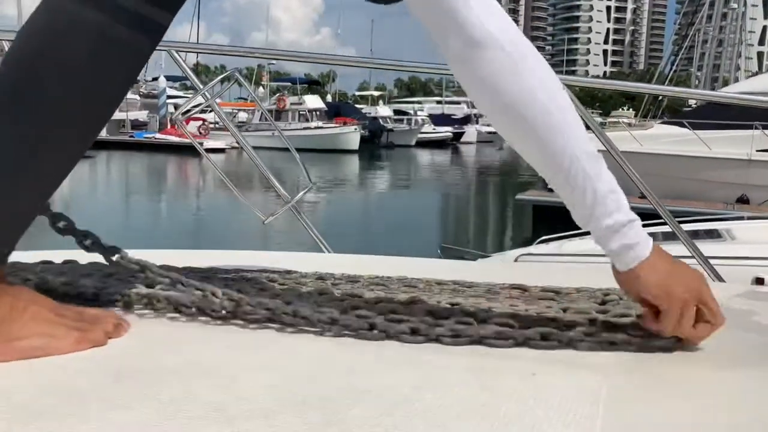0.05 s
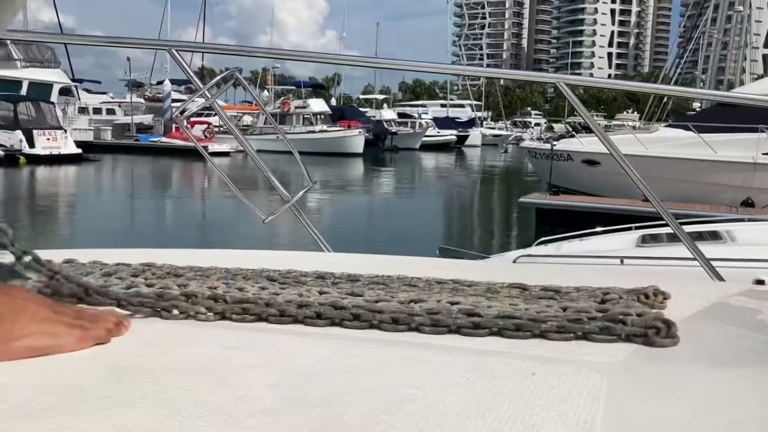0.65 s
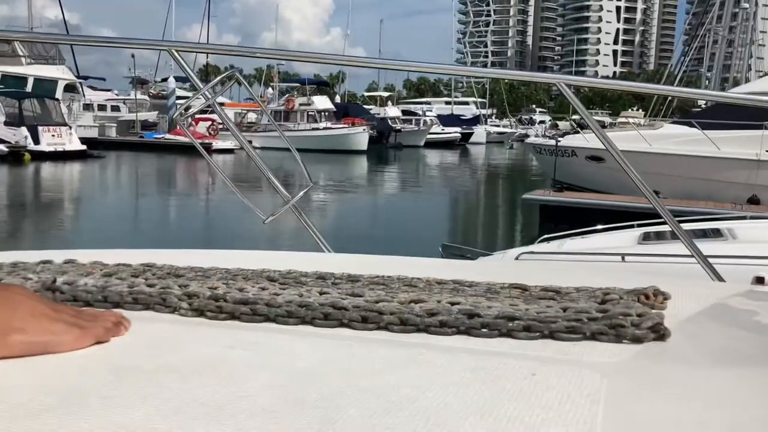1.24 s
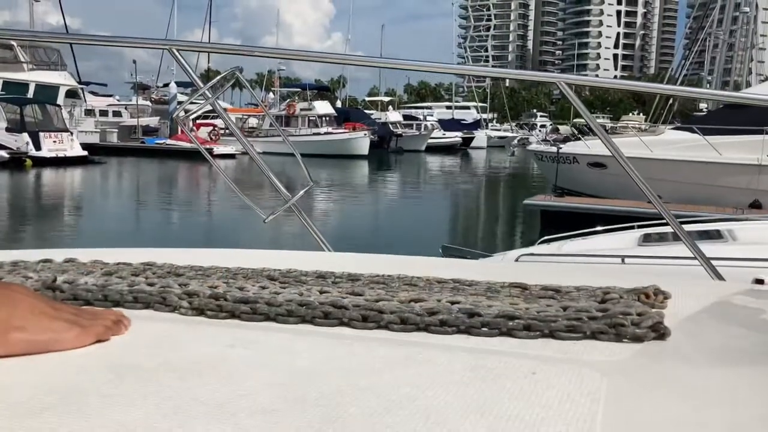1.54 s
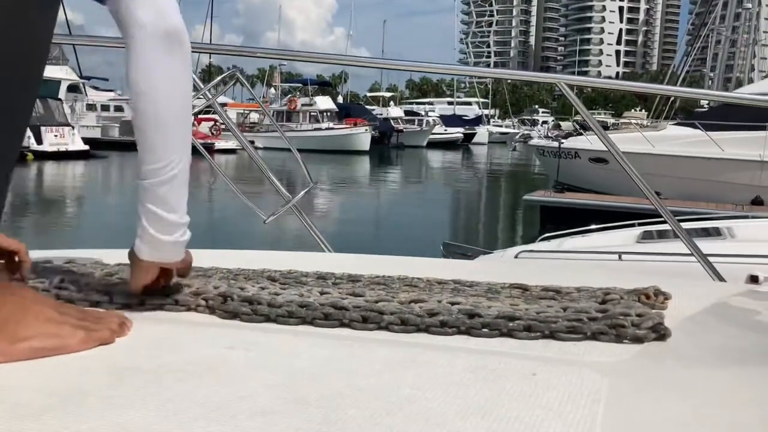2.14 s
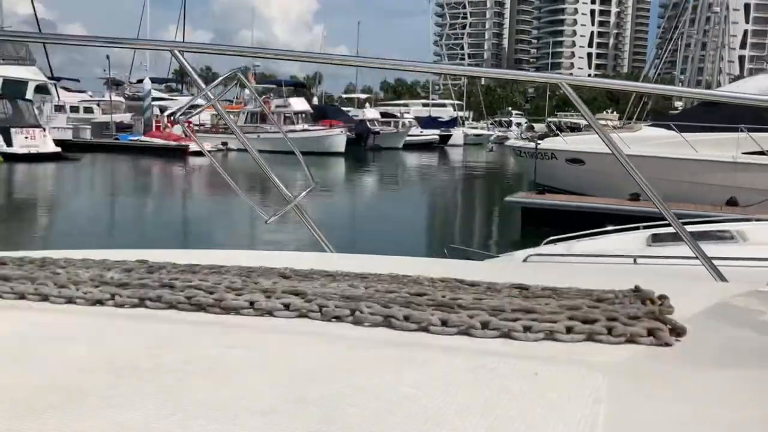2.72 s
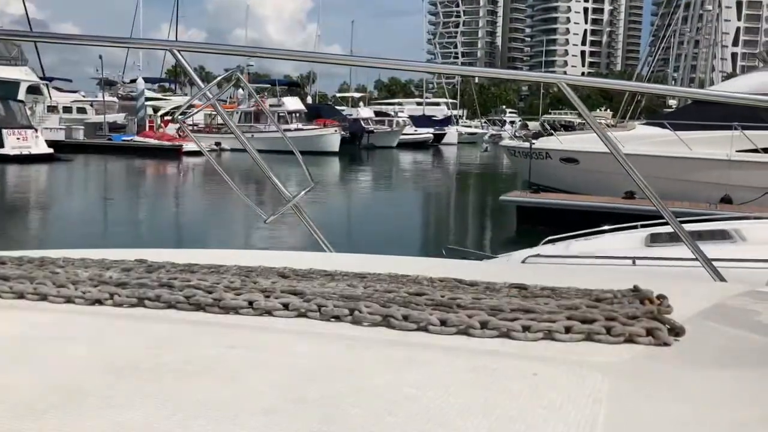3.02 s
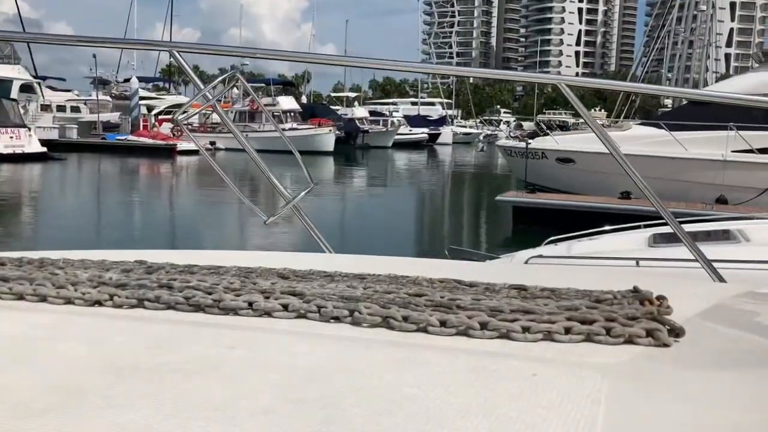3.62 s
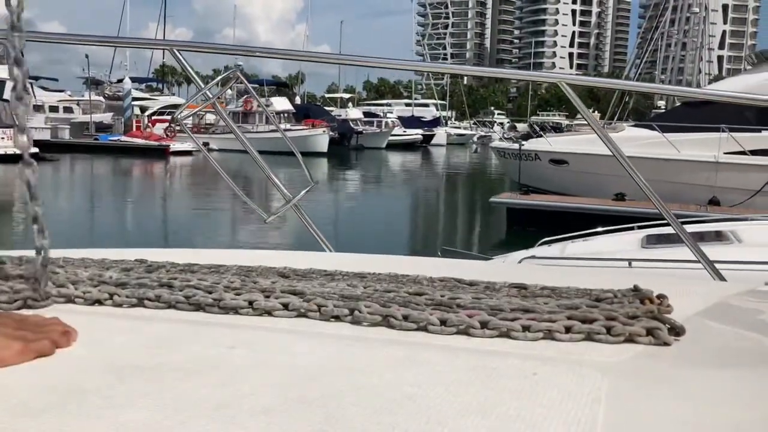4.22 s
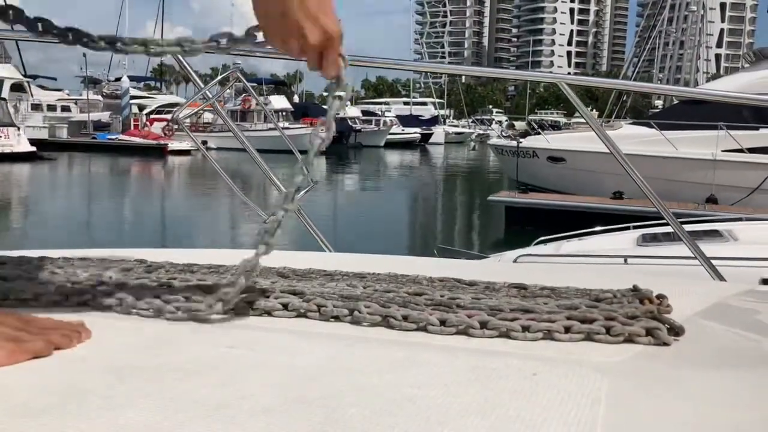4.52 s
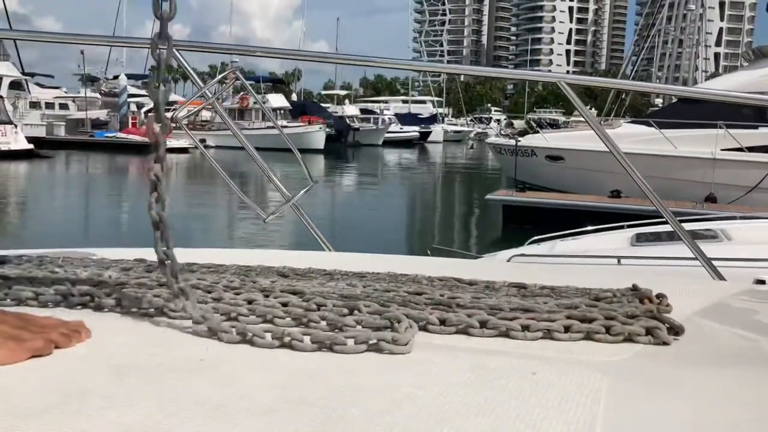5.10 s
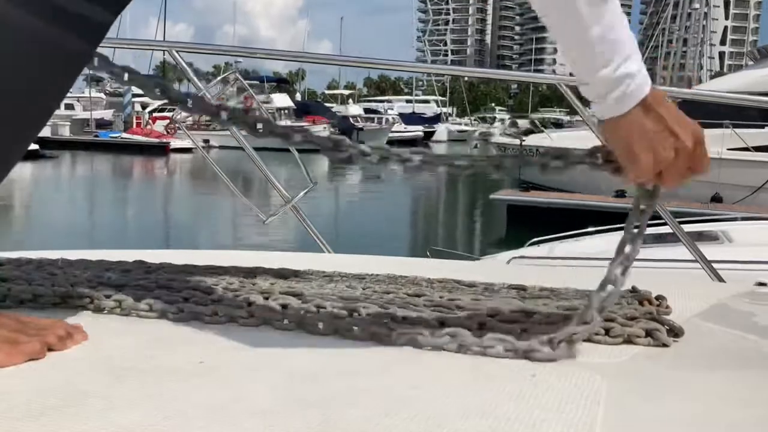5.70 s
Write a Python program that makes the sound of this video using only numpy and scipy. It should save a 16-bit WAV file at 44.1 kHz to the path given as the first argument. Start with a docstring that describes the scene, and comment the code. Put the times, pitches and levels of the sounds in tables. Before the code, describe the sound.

A heavy steel anchor chain is hauled and laid on a hollow fibreglass boat deck, heard close and slightly left, over a steady low marina rumble. It opens with a rattling drop and deck thumps in the first 0.2 seconds. Short, uneven rattles and gritty scrapes follow, with distinct dull clacks at about 0.8, 1.2, 1.9 and 2.5 seconds and faint settling clicks between. The deck booms deeply near 2.9 seconds, and a sharp, loud clack lands at 3.2. From 3.5 to 4 seconds the links rattle more brightly, with small ticks. The hull grumbles in swells from about 3.8 to 4.8 seconds as weight shifts, and a heavy dull knock of chain hits the deck at 4.75. More clacks and rattles come around 5.2 seconds, a brief thin ring at 5.5, and a last clack at 5.7.

```python
"""A heavy steel anchor chain rattles and clacks, hauled hand over hand and laid in rows on a boat deck.
Links knock dully on the pile, scrape as they slide, and ring only when they hang free.
The hollow fibreglass deck booms and grumbles under feet and chain; the marina rumbles behind."""
import sys
import numpy as np
from scipy.fft import rfft, irfft, next_fast_len
from scipy.io import wavfile
from scipy.ndimage import uniform_filter1d, minimum_filter1d, map_coordinates

SR = 44100
rng = np.random.default_rng(int(sys.argv[2]) if len(sys.argv) > 2 else 0)


def inscribe(sig):
    """Save sig as 16-bit PCM at rate SR to the path in sys.argv[1].

    A 1-D sig is mono; a 2-D sig holds one channel per row.
    Samples are clipped to [-1, 1] before scaling.
    """
    pcm = np.round(np.clip(np.atleast_2d(sig).T, -1, 1) * 32767)
    wavfile.write(sys.argv[1], SR, pcm.astype(np.int16))


N = 253575
KNOCK_REF_DB = -22.5  # lighter contacts sound more of the deck, harder ones more of the link
MODE_GAIN, MODE_Q = 0.93, 70


def amp(db):
    """Decibels to gain."""
    return 10 ** (np.asarray(db) / 20)


def unit(x):
    """Scale each row to rms 1."""
    return x / np.sqrt(np.mean(np.abs(x) ** 2, axis=-1, keepdims=True) + 1e-20)


def spectrum_db(points, hz):
    """Interpolate (Hz, dB) points on a log frequency axis."""
    point_hz, db = np.transpose(points)
    return np.interp(np.log(hz + 1), np.log(point_hz + 1), db)


def wobble(rate_hz):
    """Smooth random curve, rate_hz knots a second."""
    knots = rng.standard_normal(int(N * rate_hz / SR) + 4)
    return map_coordinates(knots, [np.arange(N) * rate_hz / SR])


def movement(t, start, end, rise_db_per_s=1000, fall_db_per_s=900):
    """Envelope that gathers before start and settles after end."""
    return amp(-rise_db_per_s * np.maximum(start - t, 0) - fall_db_per_s * np.maximum(t - end, 0))


def filtered(x, response):
    """Apply a frequency response to x."""
    size = next_fast_len(N + SR // 2)
    return irfft(rfft(x, size) * response(np.fft.rfftfreq(size, 1 / SR)), size)[..., :N]


def resonance(hz, centre_hz, q):
    """Causal response of one damped mode."""
    damping = 1j * hz * centre_hz / q
    return damping / (centre_hz ** 2 - hz ** 2 + damping)


def minimum_phase(points, hz):
    """Causal response through (Hz, dB) points."""
    cepstrum = irfft(np.log(amp(spectrum_db(points, hz))))
    half = len(cepstrum) // 2
    cepstrum[1:half] *= 2
    cepstrum[half + 1:] = 0
    return np.exp(rfft(cepstrum))


def stereo_noise(points, side_db):
    """Noise of rms 1, shaped by (Hz, dB) points."""
    mid, side = filtered(rng.standard_normal((2, N)), lambda hz: amp(spectrum_db(points, hz)))
    return unit(np.array([mid + amp(side_db) * side, mid - amp(side_db) * side]))


def placed(times, sounds):
    """Sum one short sound per time into a track."""
    index = np.round(np.maximum(times, 0) * SR).astype(int)[:, None] + np.arange(sounds.shape[-1])
    return np.bincount(index.ravel(), sounds.ravel(), N)[:N]


def tones(times, hz, db, t60_s, attack_s, size=16384):
    """Damped modes with a soft start."""
    t = np.arange(size) / SR
    envelope = (1 - np.exp(-t / attack_s)) * amp(-60 * t / t60_s[:, None])
    envelope /= envelope.max(axis=1, keepdims=True)
    return placed(times, amp(db)[:, None] * envelope * np.sin(2 * np.pi * hz[:, None] * t))


# Position of the moving chain. Each row: time in seconds, lead of the left channel in ms.
CHAIN_PATH = [(0, -0.1), (.5, -0.037), (1.2, 0.24), (1.6, 0.24), (1.85, .067), (2.55, 0.086), (2.72, 0.29),
              (3.3, 0.24), (4.52, 0.33), (4.62, 0.04), (5.0, 0.16), (5.16, 0.32), (5.28, 0.03),
              (5.75, 0.22)]


def left_lead_ms(times):
    """The nearer side hears the chain earlier."""
    return np.interp(times, *np.transpose(CHAIN_PATH))


def strikes(times, gains, colour, scatter_db, scatter_t60_s, size=1024):
    """Sharp blows, each passed on through neighbouring links as its own short scatter."""
    t, hz = np.arange(size) / SR, np.fft.rfftfreq(size, 1 / SR)
    noise = rng.standard_normal((len(times), 2, size))
    scatter = unit(noise * amp(-60 * t / scatter_t60_s)) / np.sqrt(size)
    blow = (1 + amp(scatter_db) * rfft(scatter)) / np.hypot(1, amp(scatter_db))
    # bending waves in the deck carry the treble first: a downward chirp
    travel_s = 0.001  # at 1 kHz
    chirp = np.exp(-4j * np.pi * travel_s * np.sqrt(hz * 1000))
    body = gains[:, None] * colour(hz) * chirp
    lead_ms = (left_lead_ms(times) + rng.normal(0, 0.042, len(times)))[:, None]
    pan_db = 11 * lead_ms - 2.5
    ears = [amp(sign * pan_db / 2) * np.exp(sign * 1j * np.pi * hz * lead_ms / 1000) for sign in (1, -1)]
    return np.array([placed(times - travel_s, irfft(blow[:, c] * body * ear))
                     for c, ear in enumerate(ears)])


# Short modes of the damped links and the deck under them, in Hz.
PILE_MODES_HZ = [390, 760, 1010, 1110, 1550, 1890, 2370, 2930, 3110, 3410, 3654, 3966, 4430, 5174, 5728,
                 7180, 8070]
# Treble of steel on steel. Each row: frequency in Hz, relative level in dB.
STEEL_SPECTRUM = [(1500, -57), (2500, -4), (3100, -3.5), (3700, 4), (4400, 0.5), (5200, -5.5),
                  (6200, -11.5), (7200, -9), (8500, -5.5), (10100, -24), (11500, -55)]


def link_colour(hz, pitch_hz, knock_db, tick_db, q, deck_hz):
    """A link damped by the pile: a short clack, the deck's knock below, a steel tick above."""
    modes = np.array([resonance(hz, mode_hz, MODE_Q) for mode_hz in PILE_MODES_HZ])
    # every contact excites the modes at new strengths
    ring = 1 + MODE_GAIN * rng.standard_normal((len(pitch_hz), len(modes))) @ modes
    clack = unit(ring * resonance(hz, pitch_hz[:, None], q) ** 3 / (1 + (hz / 3500) ** 8))
    knock = unit(ring * resonance(hz, deck_hz, q=0.57) ** 2)
    tick = unit(ring * minimum_phase(STEEL_SPECTRUM, hz))
    return clack + amp(knock_db[:, None]) * knock + amp(tick_db[:, None]) * tick


# Each row: start in seconds, end in seconds, level in dB, treble in dB re that level.
CHAIN_SLIDES = [(0, 0.039, -24.5, -37.5), (0.039, 0.161, -35.5, -38.5), (0.199, 0.241, -43.5, -42.5),
                (0.486, 0.583, -49.5, -32), (0.605, 0.637, -40.5, -14.5), (.868, 0.936, -37.5, -27),
                (0.953, 1.025, -40, -28.5), (1.048, 1.074, -23.5, -21.5), (1.147, 1.175, -44.5, -11.5),
                (1.35, 1.398, -42.5, -8), (1.444, 1.474, -32.5, -23), (1.482, 1.529, -42, -16),
                (1.58, 1.61, -27.5, -13), (1.672, 1.73, -35.5, -12.5), (1.801, 1.844, -31.5, -19),
                (1.9, 1.929, -23, -17), (1.941, 1.999, -45, -15), (2.152, 2.234, -52.5, -27),
                (2.293, 2.329, -48.5, -31), (2.482, 2.494, -24, -24), (2.643, 2.676, -35.5, -18.5),
                (2.709, 2.784, -34.5, -22), (2.97, 3.04, -44, -21), (3.189, 3.215, -27.5, -22),
                (3.238, 3.261, -36, -18), (3.281, 3.343, -29.5, -16), (3.584, 3.609, -29.5, -13),
                (3.635, 3.684, -31, -11.5), (3.707, 3.836, -29, -8.5), (3.883, 3.969, -30, -14.5),
                (4.119, 4.168, -41.5, -14), (4.213, 4.334, -52, -23), (4.342, 4.415, -32.5, -19),
                (4.414, 4.479, -28.5, -14.5), (4.494, 4.581, -37.5, -11.5), (4.606, 4.74, -39, -14.5),
                (4.767, 4.868, -30, -39), (5.043, 5.12, -47.5, -37), (5.144, 5.197, -28, -16),
                (5.254, 5.319, -30, -20), (5.314, 5.432, -42.5, -34), (5.492, 5.587, -37, -12.5)]


def rattle(count=34, lead_s=0.008, tail_s=0.012, spread_db=6.5, fade_db=3.5, on_deck_db=-24):
    """A length of chain shifts: a fading shower of unequal contacts, denser in a quick jerk."""
    contacts = []
    for start, end, db, tick_db in CHAIN_SLIDES:
        length_s = end - start + lead_s + tail_s
        times = start - lead_s + length_s * (np.arange(count) + rng.random(count)) / count
        size_db = spread_db * np.clip(rng.standard_normal(count), -2, 1.2)
        sizes = unit(amp(size_db - fade_db * (times - start) / length_s))
        gains = amp(db) * sizes * movement(times, start, end) * np.sqrt(SR * length_s / count)
        dullness_db = max(on_deck_db - tick_db, 0)  # a dull slide lies on the deck and knocks more
        knock_db = -6 - 0.42 * (db - KNOCK_REF_DB) + 0.39 * dullness_db
        contacts.append(np.broadcast_arrays(times, gains, knock_db, tick_db))
    times, gains, knock_db, tick_db = np.concatenate(contacts, axis=1)
    pitch_hz = 1226 * np.exp(0.33 * rng.standard_normal(len(times)))
    colour = lambda hz: link_colour(hz, pitch_hz, knock_db, tick_db, q=1.81, deck_hz=450)
    return strikes(times, gains, colour, scatter_db=-3, scatter_t60_s=0.025)


def scrape(share_db=-5, catch_db=2.5, lurch_db=8.5):
    """Rough galvanised steel hisses in each slide, catching on its grain, lurching link by link."""
    t = np.arange(N) / SR
    coarse_t = t[::64]
    rubs = [amp(db + tick_db) * movement(coarse_t, start, end) for start, end, db, tick_db in CHAIN_SLIDES]
    envelope = np.interp(t, coarse_t, np.max(rubs, axis=0))
    roughness = unit(amp(catch_db * wobble(220) + lurch_db * wobble(55)))
    modes = lambda hz: 1 + MODE_GAIN * sum(resonance(hz, mode_hz, MODE_Q) for mode_hz in PILE_MODES_HZ)
    steel = unit(filtered(stereo_noise(STEEL_SPECTRUM, side_db=-5.5), modes))
    hiss = amp(share_db) * envelope * roughness * steel
    lead_s = left_lead_ms(t) / 1000
    return np.array([np.interp(t + sign * lead_s / 2, t, ear) for sign, ear in zip((1, -1), hiss)])


def settling(count=520, loudest_db=-22, range_db=13):
    """The pile never quite rests: single links slip faintly into place."""
    when, softness, pitch = rng.random((count, 3)).T
    pitch_hz = 750 + 800 * pitch
    knock_db, tick_db = np.full(count, -4), np.full(count, -19)
    gains = amp(loudest_db - range_db * softness)
    colour = lambda hz: link_colour(hz, pitch_hz, knock_db, tick_db, q=1.0, deck_hz=440)
    return strikes(when * N / SR, gains, colour, scatter_db=-1, scatter_t60_s=0.028)


# Each row: frequency in Hz, relative noise density in dB.
MARINA_SPECTRUM = [(15, -32), (25, -7.5), (53, 5.5), (76, 8), (192, -15), (625, -23.5), (1110, -27),
                   (1230, -34), (3120, -41.5), (4550, -45), (6470, -56.5), (8330, -48), (10200, -69.5),
                   (13200, -91), (22000, -120)]


def marina(level_db=-37, wander_db=1.3):
    """Far engines and town: a low, slowly wandering rumble."""
    return amp(level_db + wander_db * wobble(4)) * stereo_noise(MARINA_SPECTRUM, side_db=-6)


# Each row: frequency in Hz, relative noise density in dB.
HULL_SPECTRUM = [(30, -8), (70, 3.5), (130, 0), (250, -5.5), (380, -13), (700, -58), (2000, -78.5),
                 (5000, -110)]
# Each row: time of the crest in seconds, rumble level in dB.
WEIGHT_SHIFTS = [(.13, -30.5), (.9, -34.5), (2.959, -28.5), (3.8, -27.5), (3.97, -23.5), (4.45, -20.5),
                 (4.761, -20.5)]


def hull_grumble(footing_db=-39.5):
    """The hull rumbles under balancing feet and swells as weight shifts."""
    t = np.arange(N) / SR
    load = sum(amp(db) * movement(t, crest_s, crest_s, rise_db_per_s=144.5, fall_db_per_s=162)
               for crest_s, db in WEIGHT_SHIFTS)
    return np.hypot(load, amp(footing_db)) * stereo_noise(HULL_SPECTRUM, side_db=-9)


# Each row: start in seconds, level in dB, pitch in Hz, relative steel tick in dB.
LINK_CLACKS = [(0.0172, -13.5, 1170, -0.5), (0.061, -15.5, 1290, -14), (.131, -15.5, 960, -51),
               (.151, -26, 1170, -42), (0.1972, -37, 1250, -16), (0.297, -38.5, 1110, -18),
               (0.374, -32.5, 1070, -19), (0.4858, -30, 1560, -20), (0.509, -42, 1320, -31),
               (0.5363, -21, 963, -42), (0.5646, -37, 1370, -37), (0.6078, -20.5, 1570, -49),
               (.6309, -24, 1240, -43), (.783, -28, 1280, -24), (.802, -14, 1640, -48),
               (0.8104, -11, 1730, -43), (0.8178, -19, 1720, -15), (.863, -43, 1360, -34),
               (0.954, -24, 1290, -12.5), (1.0487, -24, 1400, -4.5), (1.2004, -12, 1340, -7.5),
               (1.206, -11.5, 1130, -18), (1.5495, -31, 1180, -35), (1.738, -25.5, 1480, -37),
               (1.744, -27.5, 1480, -36), (1.821, -31, 1660, -21), (1.9415, -13.5, 1780, -12),
               (1.9508, -20, 1610, -14), (1.965, -28, 1560, -26), (2.1743, -37, 1320, -32),
               (2.2236, -29, 1480, -15), (2.2312, -23, 1400, -37), (2.28, -39.5, 1400, -26),
               (2.362, -31, 1420, -15), (2.4194, -27.5, 1610, -27), (2.499, -13, 1380, -12.5),
               (2.5225, -16.5, 1330, -38), (2.5415, -20.5, 1330, -31), (2.6466, -21.5, 990, -43),
               (2.7078, -18, 1570, -17), (2.757, -23.5, 1600, -45), (2.888, -32, 1700, -32),
               (2.98, -29.5, 1390, -10), (3.122, -27, 1460, -13), (3.2165, -5, 1380, -6),
               (3.2828, -12.5, 1155, -36), (3.319, -23, 1570, 1), (3.423, -25, 1350, -18),
               (3.5006, -15.5, 1540, -4.5), (3.5134, -21, 1560, -3), (4.2038, -29, 1410, -42),
               (4.4347, -14, 1530, -8), (4.5554, -19, 1970, -14), (4.6108, -18.5, 900, -45),
               (4.653, -28, 1180, -27), (4.6926, -25, 1360, -47), (4.749, -3.5, 1080, -52),
               (4.7813, -18, 1308, -33), (4.826, -26, 960, -29), (4.862, -33, 1190, -39),
               (5.0296, -32, 1750, -8), (5.046, -34, 1050, -43), (5.0728, -41, 1130, -36),
               (5.1712, -16.5, 1480, -15), (5.2298, -23, 1450, -24), (5.2806, -17.5, 1410, -39),
               (5.2982, -20.5, 1550, -23), (5.493, -18, 1200, -33), (5.711, -11.5, 1125, -35)]
# One neighbour takes up the slack, two follow. Each row: nominal delay in seconds, level offset in dB.
JOSTLED_LINKS = [(-.005, -23), (.004, -6.5), (.009, -11)]


def clacks(spread=0.5, give_db_per_db=0.12, tick_offset_db=-5.5):
    """Single links drop on the pile or snap taut; each jostles its quieter neighbours."""
    start_s, db, pitch_hz, tick_db = np.transpose(LINK_CLACKS)[:, :, None]
    struck_link = (0.00015, 0.0032)  # delay in seconds, offset in dB
    delay_s, offset_db = np.transpose([struck_link] + JOSTLED_LINKS)
    draws = rng.uniform(-0.5, 0.5, (len(LINK_CLACKS), 2, len(delay_s)))
    timing, tuning = np.exp(spread * draws).swapaxes(0, 1)
    times = (start_s + delay_s * timing).ravel()
    pitch_hz = (pitch_hz * tuning).ravel()
    db = (db + offset_db - give_db_per_db * (db - KNOCK_REF_DB)).ravel()
    tick_db = np.repeat(tick_db + tick_offset_db, len(delay_s))
    knock_db = -8 - 0.32 * (db - KNOCK_REF_DB)
    gains = amp(db) * np.sqrt(0.004 * SR)  # energy of 4 ms at this level
    colour = lambda hz: link_colour(hz, pitch_hz, knock_db, tick_db, q=1.147, deck_hz=380)
    return strikes(times, gains, colour, scatter_db=-4, scatter_t60_s=0.02)


# Each row: frequency in Hz, relative level in dB.
GLANCE_SPECTRUM = [(1500, -27), (3500, 7.5), (6000, -4), (8300, 7.5), (10000, -8), (11500, -53)]
# Each row: start in seconds, relative level in dB.
LINK_TICKS = [(0.0253, -21), (1.1016, -38), (1.198, -30), (2.564, -39), (2.944, -36), (3.265, -29.5),
              (3.455, -29.5), (3.7488, -17), (3.802, -14.5), (4.408, -25), (4.515, -27.5), (4.5735, -22.5),
              (4.7166, -27), (5.239, -29.5), (5.3458, -31), (5.409, -23), (5.5008, -23), (5.606, -29.5)]


def link_ticks(gain_db=9):
    """Hanging links glance off each other with a bright tick."""
    times, db = np.transpose(LINK_TICKS)
    colour = lambda hz: unit(minimum_phase(GLANCE_SPECTRUM, hz))
    return strikes(times, amp(db + gain_db), colour, scatter_db=12.5, scatter_t60_s=0.026)


# Each row: start in seconds, peak in dB before panning, panel pitch in Hz.
PANEL_THUMPS = [(0.037, -20.5, 82), (.063, -20, 430), (.083, -22, 547), (0.154, -19.5, 80), (.331, -23, 70),
                (.866, -24, 89), (1.202, -25.5, 290), (1.358, -31.5, 470), (2.767, -23.5, 408),
                (2.857, -20.5, 57), (2.926, -10.5, 81.3), (3.01, -25.5, 398), (3.281, -26.5, 243),
                (3.463, -15, 97), (3.587, -22, 425), (3.719, -18.5, 86), (3.769, -27, 400),
                (3.898, -40, 292), (3.978, -30.5, 268), (4.029, -25, 61), (4.409, -16.5, 66),
                (4.436, -22.5, 232), (4.713, -27, 61), (4.75, -14, 378), (4.867, -21, 127),
                (4.963, -24.5, 86), (5.419, -24, 80.7), (5.628, -25.5, 86)]


def deck_booms(ref_hz=80, ref_t60_s=0.098, pan_db_per_octave=4.7):
    """Weight lands on hollow deck panels; the small, high ones die sooner and lie to the right."""
    times, db, hz = np.transpose(PANEL_THUMPS)
    t60_s = ref_t60_s * (ref_hz / hz) ** 0.32
    pan_db = pan_db_per_octave * np.log2(hz / ref_hz)
    return np.array([tones(times, hz, db + sign * pan_db / 2, t60_s, attack_s=0.003) for sign in (-1, 1)])


# Each row: start in seconds, pitch in Hz, nominal peak in dB, T60 in seconds.
RINGS_AND_CRACKS = [(1.575, 3520, -34, 0.036), (1.945, 3590, -38.5, 0.092), (3.217, 5270, -14.5, 0.0045),
                    (3.4991, 5040, -14.5, 0.0024), (3.752, 8300, -39, 0.062), (4.776, 7880, -42, .07),
                    (5.411, 7800, -50, 0.078), (5.527, 3950, -30, .12), (5.703, 3890, -41, 0.12)]


def rings_and_cracks(shake_db=4.4, flutter_s=0.00002):
    """Brief fluttering rings of free links, and the sharp bright crack of two hard clacks."""
    t = np.arange(N) / SR
    steel = tones(*np.transpose(RINGS_AND_CRACKS), attack_s=0.002)
    # in the longer rings, brushing a neighbour shakes the link's level and pitch
    shake = amp(shake_db * wobble(220))
    fluttered = np.interp(t + flutter_s * wobble(350), t, steel)
    return shake * fluttered * amp([[-0.3], [0.3]])


def scene():
    """Chain, deck and marina in stereo."""
    chain = clacks() + rattle() + settling() + scrape() + link_ticks() + rings_and_cracks()
    return chain + deck_booms() + hull_grumble() + marina()


def record(dry):
    """A limiter ducks the hardest clacks; a steep low-pass follows."""
    ceiling, window_samples, cutoff_hz = 0.9, 133, 10300
    needed = ceiling / np.maximum(np.abs(dry).max(axis=0), ceiling)
    gain = uniform_filter1d(minimum_filter1d(needed, window_samples), window_samples)
    return filtered(dry * gain, lambda hz: 1 / np.sqrt(1 + (hz / cutoff_hz) ** 40))


dry = scene()
out = record(dry)
inscribe(out)
```